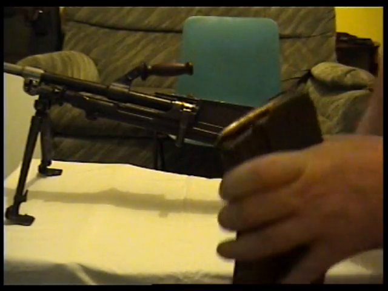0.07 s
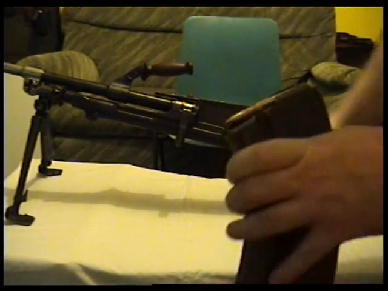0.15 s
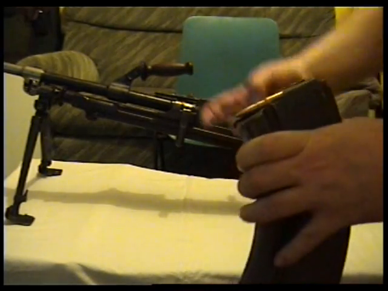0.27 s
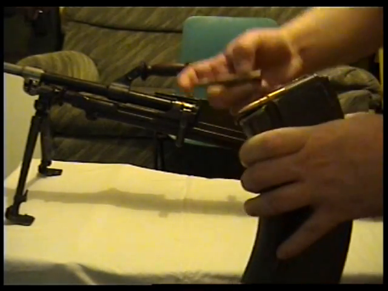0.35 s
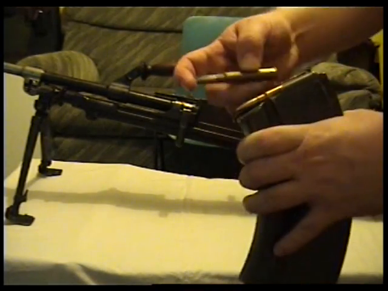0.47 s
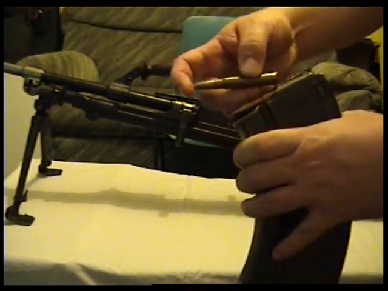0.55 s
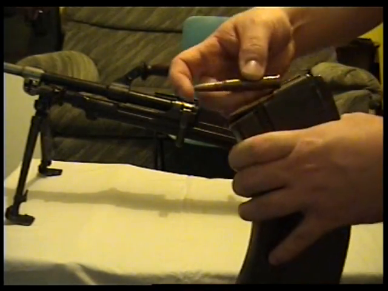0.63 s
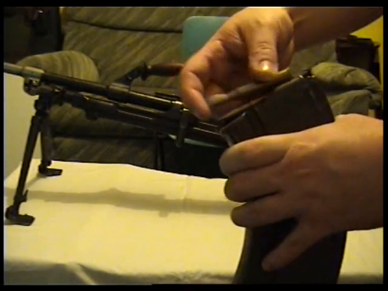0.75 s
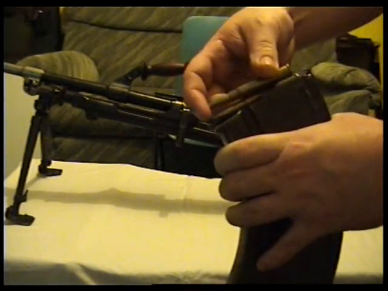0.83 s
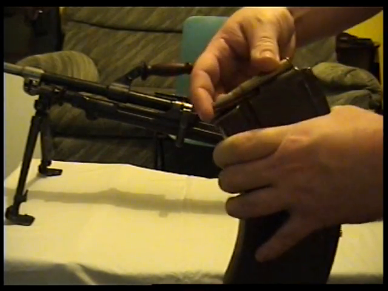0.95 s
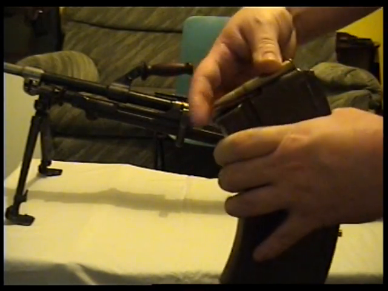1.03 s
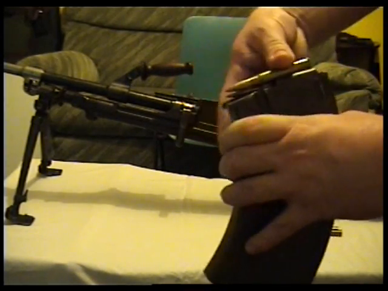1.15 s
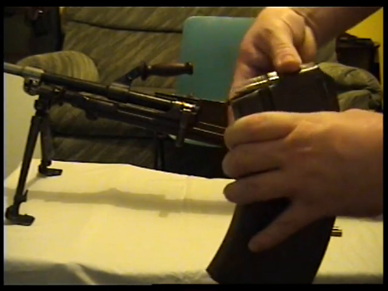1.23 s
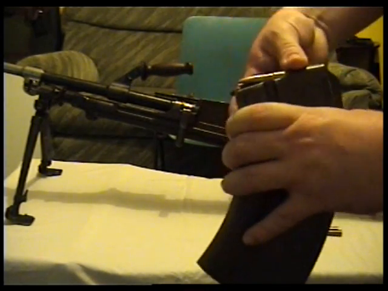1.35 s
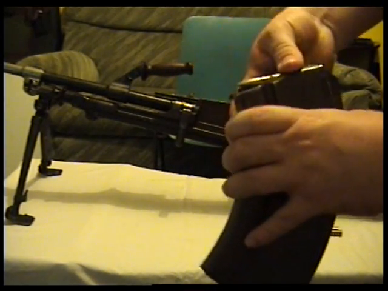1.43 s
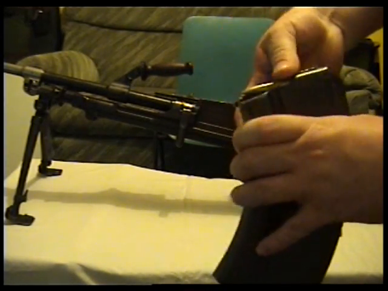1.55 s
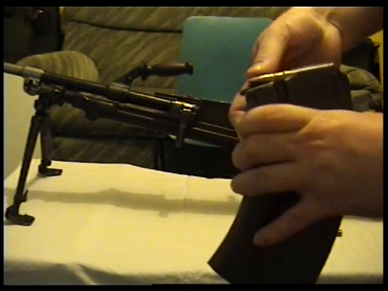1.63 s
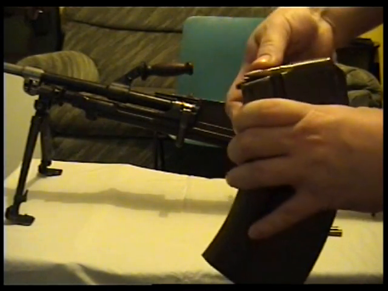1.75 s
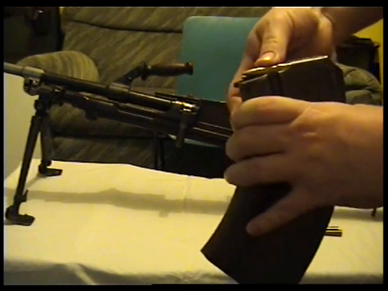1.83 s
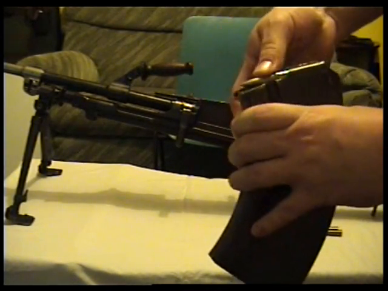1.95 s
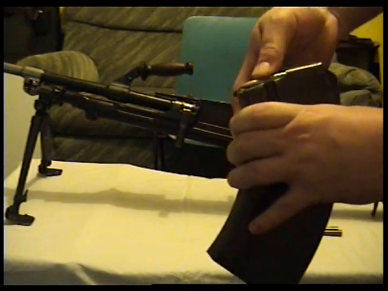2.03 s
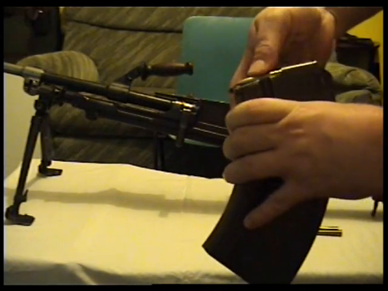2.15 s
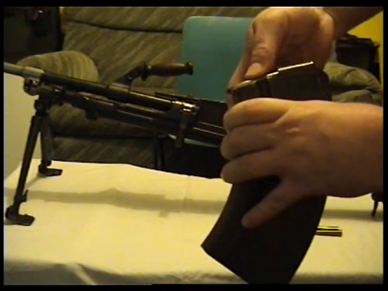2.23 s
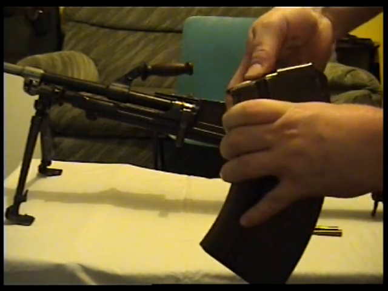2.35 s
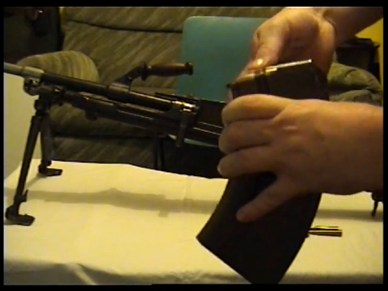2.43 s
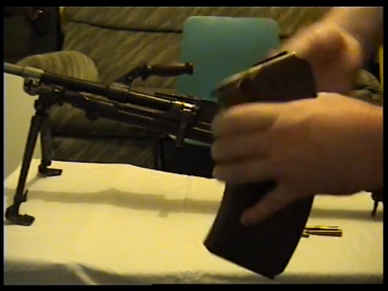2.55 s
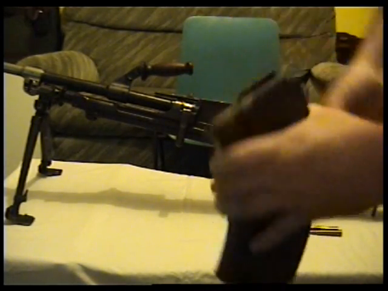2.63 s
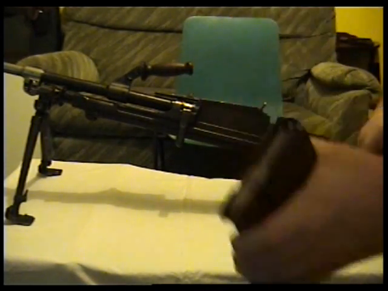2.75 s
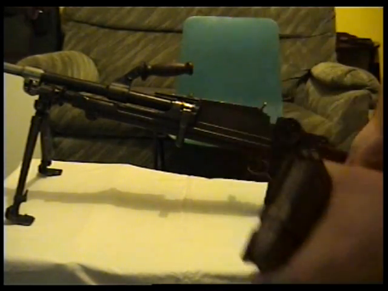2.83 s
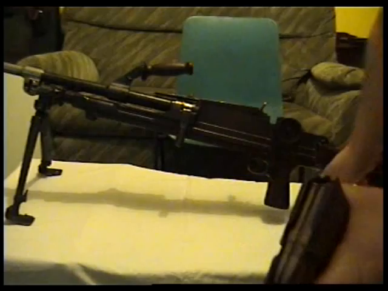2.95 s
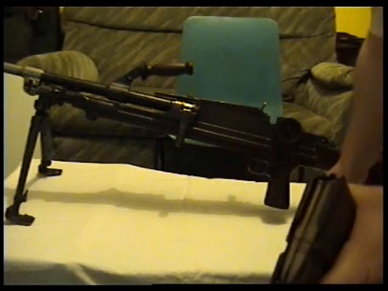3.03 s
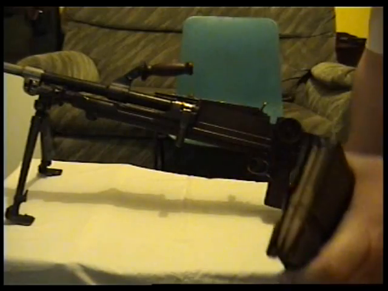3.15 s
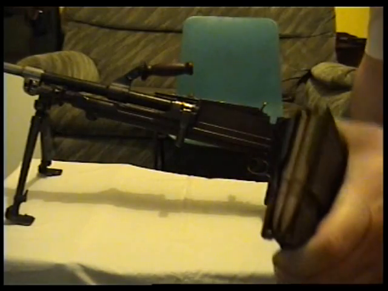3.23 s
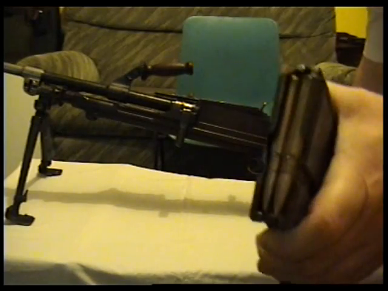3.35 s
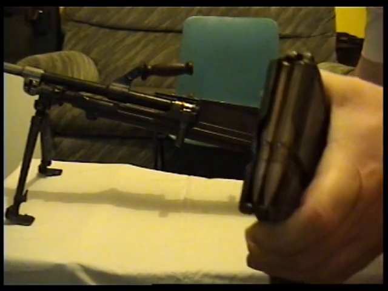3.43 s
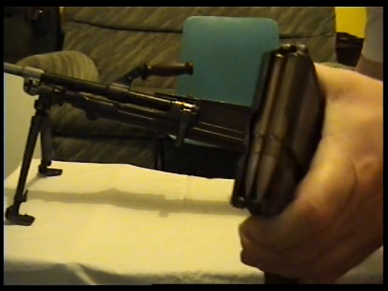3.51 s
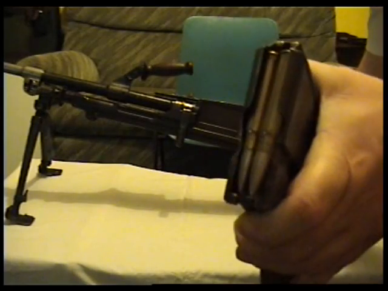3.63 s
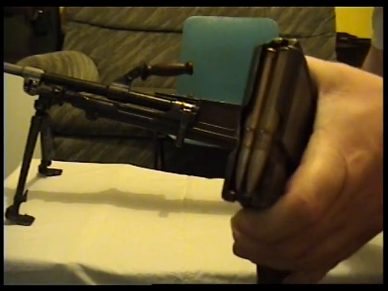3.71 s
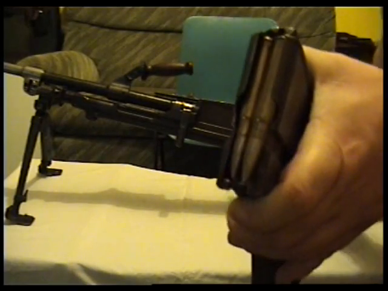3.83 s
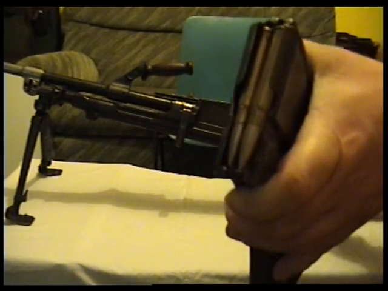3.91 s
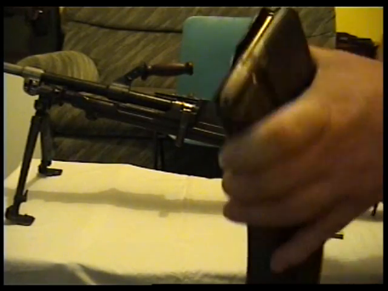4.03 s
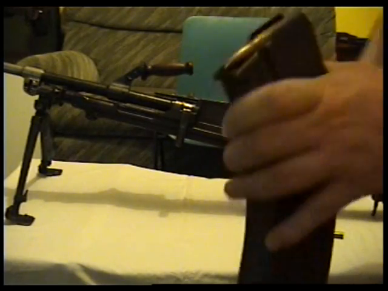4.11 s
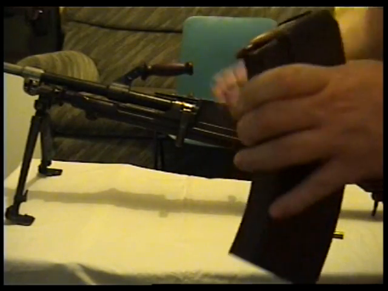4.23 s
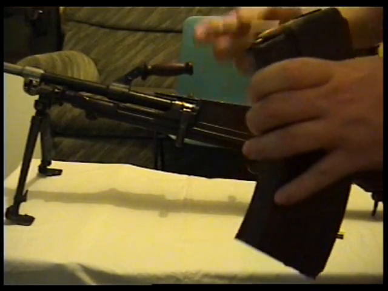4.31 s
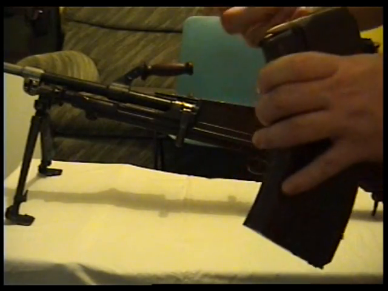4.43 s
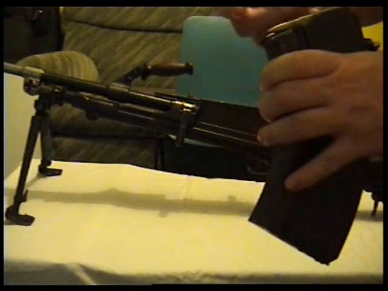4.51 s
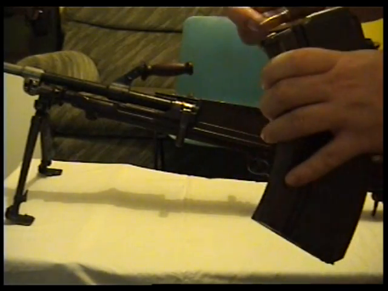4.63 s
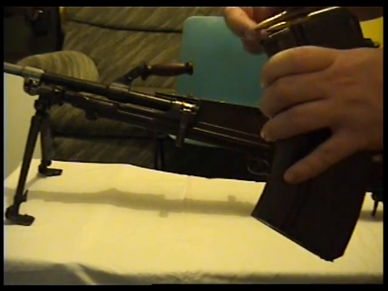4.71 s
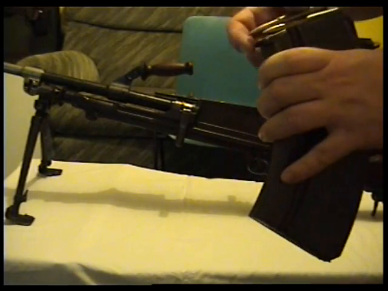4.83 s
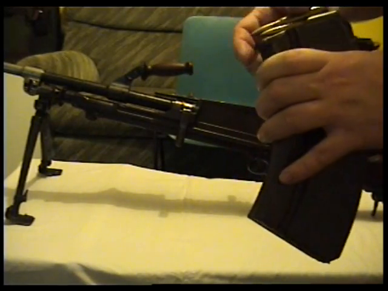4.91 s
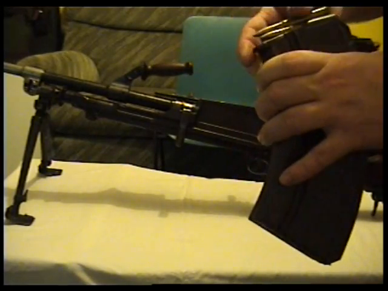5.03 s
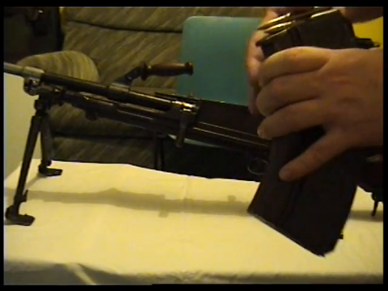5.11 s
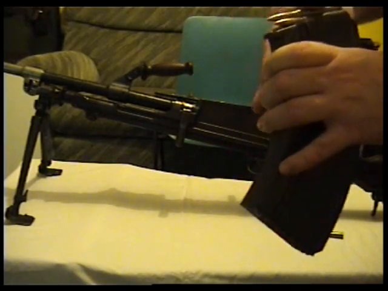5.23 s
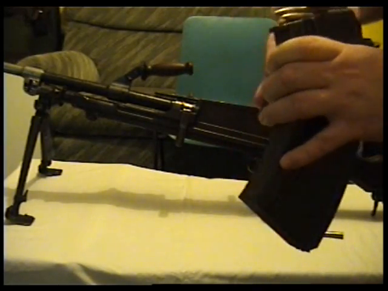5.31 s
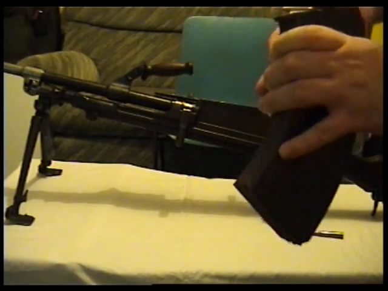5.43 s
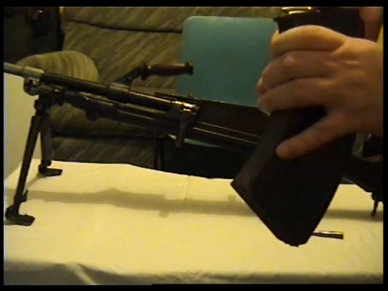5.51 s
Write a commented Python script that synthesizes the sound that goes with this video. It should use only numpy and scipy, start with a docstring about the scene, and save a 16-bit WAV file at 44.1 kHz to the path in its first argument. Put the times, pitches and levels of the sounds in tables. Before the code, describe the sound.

Close to the microphone in a small furnished room, a cartridge knocks on a steel magazine, scrapes along its lips and snaps in hard. A second snap follows, then loose brass cases clink in the hand, and two or three more quick knocks and grinding snaps end the passage over faint hiss.

```python
"""Knocks, scrapes and grinding snaps as rifle cartridges are thumbed into a steel magazine in a small room.
Between loads, loose brass cases clink and rub in the hand over a faint hum and hiss.
Each contact is a noise crack plus damped magazine modes, filtered for the place where brass meets steel.
Scrapes, slides and grinds are random trains of such contacts; the cases are high damped modes plus noise.
Filtered noise tails give the room; a limiter, clipping and a low-pass give hard, flattened peaks and a dull top."""
import sys
import numpy as np
from scipy import signal
from scipy.fft import rfft, irfft
from scipy.io import wavfile
from scipy.ndimage import uniform_filter1d, minimum_filter1d

SR = 44100
rng = np.random.default_rng(int(sys.argv[2]) if len(sys.argv) > 2 else 0)


def generate_wav(signal):
    """Clip the signal to [-1, 1] and save it as 16-bit WAV at the path in sys.argv[1]."""
    frames = np.transpose(np.atleast_2d(signal))
    scaled = np.clip(frames, -1, 1) * 32767
    pcm = np.round(scaled).astype(np.int16)
    wavfile.write(sys.argv[1], SR, pcm)


N = 245195
SIZE = 16384  # samples per single sound or impulse response
T = np.arange(SIZE) / SR
TIME = np.arange(N) / SR
HZ = np.maximum(np.arange(SIZE // 2 + 1) * SR / SIZE, 1)
TOP_HZ = 12000
SILENT_DB = -120


def undb(db):
    """Decibels to amplitude gain."""
    return 10 ** (np.asarray(db) / 20)


def unit(x):
    """Scale to an energy of one."""
    return x / np.sqrt(np.sum(x ** 2))


def along(points, hz):
    """Interpolate (f/Hz, value) points on a log-frequency axis."""
    f, value = np.transpose(points)
    return np.interp(np.log(hz), np.log(f), value)


def fade(t60_s):
    """Exponential decay, 60 dB down at t60_s."""
    return np.exp(-np.log(1000) * T / max(t60_s, 1e-3))


def colour(x, gain_db):
    """Minimum-phase filter with a given gain on HZ, via the folded cepstrum."""
    cepstrum = irfft(np.log(undb(gain_db)))
    cepstrum[1:SIZE // 2] *= 2
    cepstrum[SIZE // 2 + 1:] = 0
    response = np.exp(rfft(cepstrum))
    return irfft(rfft(x, SIZE) * response)


def bump(hz, width_hz):
    """Power response of one resonance, width_hz wide at half power."""
    return 1 / (1 + ((HZ ** 2 - hz ** 2) / (HZ * width_hz)) ** 2)


def burst(envelope, count=3):
    """Noise under an envelope, alternately flattened in spectrum and reshaped in time."""
    x = rng.standard_normal(SIZE) * envelope
    for _ in range(count):
        x = irfft(np.exp(1j * np.angle(rfft(x))))  # keep phase only
        local_rms = np.sqrt(uniform_filter1d(x ** 2, size=128).clip(0) + 1e-12)
        x = x * envelope / local_rms
    return unit(x)


def ring(modes, scatter_db, detune):
    """Damped modes whose shares and pitches vary with the place of contact and the grip."""
    hz, level_db, t60_s = np.transpose(modes)[:, :, None]
    share, shift, side = rng.standard_normal((3, len(modes), 1))
    tones = np.sin(2 * np.pi * hz * (1 + detune * shift) * T)
    decays = np.exp(-np.log(1000) * T / t60_s)
    gains = np.sign(side) * undb(level_db + scatter_db * share)
    return unit(np.sum(gains * tones * decays, axis=0))


def add(out, start_s, x, level_db, length_s):
    """Mix x in at start_s, its rms over the first length_s set to level_db."""
    start = int(start_s * SR)
    opening = x[:max(int(length_s * SR), 8)]
    x = x * undb(level_db) / np.sqrt(np.mean(opening ** 2))
    out[start:start + len(x)] += x[:max(N - start, 0)]


def nodes(count=44):
    """Gain ripple in dB: each point of contact favours some groups of modes and misses others."""
    hz = np.geomspace(700, TOP_HZ, count)
    ripple = 3.5 * rng.standard_normal(count)
    return along(np.c_[hz, ripple - uniform_filter1d(ripple, size=5)], HZ)


def contact(crack_t60_s, ring_db, body_db, treble_db, point_hz, point_db):
    """Magazine's answer to one tap: crack plus ring, coloured by where and how hard brass meets steel."""
    # crowded, quickly damped steel modes: f/Hz, gain/dB
    crack_gain = [(60, -33), (360, -24), (530, -2.5), (650, 7), (780, -3.5), (1100, 0), (1320, -2),
                  (1750, 1.5), (4000, -4.5), (5500, -2), (8500, -12), (11200, -13.5)]
    # modes of the loaded magazine, free of the hand: f/Hz, mean relative level/dB, t60/s
    magazine_modes = [(480, -5.5, 0.043), (582.7, 2.5, 0.16), (644.2, 3.5, 0.36), (850, -2.5, 0.24),
                      (924, 1, 0.054), (978, 4, 0.12), (1127, 2.5, 0.15), (1556, 5.5, 0.14),
                      (1684, -8, 0.11), (1856, -7, 0.063), (2007, -2, 0.0966), (2410, -12, 0.062),
                      (2704, -4, 0.052), (2770, -9, 0.03), (3220, -25.5, .11), (3540, 5.5, 0.068),
                      (3500, -16, 0.063), (4120, 4.5, 0.053), (4170, -1.5, 0.07), (4180, -6.5, 0.166),
                      (4610, -12, .09), (4900, -10, 0.22), (5780, -30, .13), (6030, -12, 0.07),
                      (6140, -4.5, 0.21), (6640, -14, 0.3), (8050, -20, 0.078), (8950, -14, .12)]
    body_hz, treble_hz, lips_hz, lips_db = 1030, 6220, 3940, 5.5
    grip_t60_s = 0.55

    crack = unit(colour(burst(fade(crack_t60_s)), along(crack_gain, HZ) + nodes()))
    free_ring = ring(magazine_modes, scatter_db=2.0, detune=0.0064)
    gripped = unit(free_ring * fade(grip_t60_s))  # the hand shortens the ring
    body = body_db / (1 + (HZ / body_hz) ** 4)
    treble = treble_db / (1 + (treble_hz / HZ) ** 6)
    lips = lips_db * bump(lips_hz, 0.35 * lips_hz)
    point = point_db * bump(point_hz, 0.16 * point_hz)
    return colour(crack + undb(ring_db) * gripped, body + treble + lips + point)


def stick_slip(times_s, levels_db, ring_db, *tone):
    """Brass rubs on steel: a fast, uneven train of taps under a level curve, each answered by the magazine."""
    mean_slips_per_s, scatter_db, crack_t60_s = 3000, 1.5, 0.019
    fires = rng.random(N) < mean_slips_per_s / SR
    signs = rng.choice([-1, 1], N)
    slips = fires * signs * undb(scatter_db * rng.standard_normal(N))
    pressure = undb(np.interp(TIME, times_s, levels_db, left=SILENT_DB, right=SILENT_DB))
    response = unit(contact(crack_t60_s, ring_db, *tone))
    return signal.oaconvolve(pressure * slips / np.std(slips), response)[:N]


def air(level_db=-45, hum_hz=108, hum_db=-64, hiss_hz=4550, hiss_width_hz=800, hiss_db=4):
    """Steady room tone and microphone hiss: shaped noise with a slight treble peak, plus a faint sine hum."""
    # noise spectrum: f/Hz, relative density/dB
    noise_spectrum = [(15, -32), (25, -32.5), (53, -0.5), (76, -20), (98, -1), (133, -7.5), (186, -1.5),
                      (459, -2), (496, -3), (749, 2), (853, -3.5), (2160, -10.5), (2450, -16),
                      (4210, -20.5), (11800, -31), (15300, -69), (22000, -120)]
    hz = np.maximum(np.arange(N // 2 + 1) * SR / N, 1)
    peak_db = hiss_db * np.interp(hz, HZ, bump(hiss_hz, hiss_width_hz))
    gain = undb(along(noise_spectrum, hz) + peak_db)
    hiss = irfft(rfft(rng.standard_normal(N)) * gain, N)
    hum = np.sqrt(2) * np.sin(2 * np.pi * hum_hz * TIME)  # rms of one
    return undb(level_db) * hiss / np.std(hiss) + undb(hum_db) * hum


def room(x, gap_s=0.00237, tail_db=-9.5):
    """Table, sofa and walls return a short, dense noise tail, decaying at its own rate in each band."""
    # decay by band: f/Hz, t60/s
    band_decays = [(200, 0.27), (600, 0.39), (1500, 0.27), (4000, 0.16), (10000, 0.16)]
    hz, t60s_s = np.transpose(band_decays)
    onset = np.clip(T / gap_s - 1, 0, 1)
    tail = 0
    for share, t60_s in zip(np.eye(len(hz)), t60s_s):
        band_power = along(np.c_[hz, share], HZ) + 1e-4
        tail = tail + colour(burst(onset * fade(t60_s)), 10 * np.log10(band_power))
    return x + undb(tail_db) * signal.fftconvolve(x, unit(tail))[:N]


def rubs():
    """The hand shifts its grip and rubs the cases: half-sine swells of narrow-band noise."""
    # t/s, length/s, level/dB, centre f/Hz, resonance width before squaring/Hz
    rub_events = [(3.182, 0.031, -43, 283, 160), (3.345, 0.066, -43.5, 210, 98),
                  (3.484, 0.063, -42, 2240, 520), (3.492, 0.065, -44, 6280, 406)]
    out = np.zeros(N)
    for start_s, length_s, level_db, hz, width_hz in rub_events:
        swell = np.sin(np.pi * np.minimum(T / length_s, 1))
        gain_db = 20 * np.log10(bump(hz, width_hz) + 0.0011)  # resonance squared in power
        add(out, start_s, colour(rng.standard_normal(SIZE) * swell, gain_db), level_db, length_s)
    return out


def clinks(tick_t60_s=0.09, tick_hz=3400, tick_width_hz=5000):
    """Cases held in the fingers clink: a gritty noise tick and a short, high ring of damped modes."""
    # t/s, level/dB, dull tick relative to ring/dB
    clink_events = [(3.195, -48, -6), (3.212, -35, -11), (3.319, -25.5, -22), (3.327, -26, -20),
                    (3.398, -16.5, -12), (3.403, -23.5, -24), (3.415, -16, -14)]
    # brass case modes: f/Hz, mean relative level/dB, t60/s
    case_modes = [(5500, -26, 0.2), (5600, -7, 0.074), (5810, -1, 0.076), (5680, -15, 0.14),
                  (5920, -2.5, 0.17), (6075, -1.5, 0.05), (6170, -6, .06)]
    out = np.zeros(N)
    # resonance squared in power, with a floor
    tick_gain_db = 20 * np.log10(bump(tick_hz, tick_width_hz) + 0.00087)
    for start_s, level_db, tick_db in clink_events:
        tick = unit(colour(burst(fade(tick_t60_s)), tick_gain_db))
        case_ring = ring(case_modes, scatter_db=3.0, detune=0.0037)
        add(out, start_s, case_ring + undb(tick_db) * tick, level_db, length_s=0.0038)
    return out


def slides(ring_db=-14, treble_db=-4, point_hz=2200, point_db=8, fade_share=2.8):
    """Light stick-slip as a round is eased along or creeps before a snap; longer strokes have softer ends."""
    # t/s, hold/s, level/dB, body/dB
    slide_events = [(0.667, 0.047, -43.5, -12), (0.957, 0.084, -48, 4.5), (1.11, 0.43, -41.5, 17),
                    (1.315, 0.01, -26.5, 11.5), (1.664, 0.088, -43, 17.5), (4.726, 0.02, -30.5, -5),
                    (4.797, 0.063, -32.5, 18), (4.859, 0.01, -27.5, 1), (5.006, 0.062, -38.5, 8.5),
                    (5.095, 0.057, -41, 11.5), (5.253, 0.0068, -28, 25), (5.45, 0.11, -43, 17.5),
                    (5.521, 0.015, -23, 14)]
    out = np.zeros(N)
    for start_s, hold_s, level_db, body_db in slide_events:
        edge_s = fade_share * hold_s
        end_s = start_s + hold_s
        times_s = [start_s - edge_s, start_s, end_s, end_s + edge_s]
        levels_db = [SILENT_DB, level_db, level_db, SILENT_DB]
        out += stick_slip(times_s, levels_db, ring_db, body_db, treble_db, point_hz, point_db)
    return out


def scrape(ring_db=-14, body_db=-4, treble_db=-5, point_hz=1400, point_db=5):
    """The first round scrapes along the feed lips: one long, firm, uneven stick-slip stroke."""
    # level curve: t/s, level/dB
    stroke = [(0.76, -45), (0.792, -26), (0.802, -18.5), (0.81, -27), (0.83, -19.5), (0.852, -23.5),
              (0.866, -32), (0.888, -32), (0.9, -43)]
    return stick_slip(*np.transpose(stroke), ring_db, body_db, treble_db, point_hz, point_db)


def grinds(ring_db=-16, point_db=5.5):
    """The stack gives way on its spring: stick-slip rises fast, holds and dies, with a low thump at its start."""
    # t/s, hold/s, level/dB, thump relative to grind/dB, body/dB, treble/dB, contact resonance f/Hz
    grind_events = [(1.325, 0.059, -8.5, -21, 1, 2.5, 4250), (2.098, 0.0032, -30, -12, 15, -6, 930),
                    (2.542, 0.025, -10, -20.5, 5, 5, 1580), (4.736, 0.014, -14.5, -28, 8.5, -5.5, 6100),
                    (4.862, 0.011, -17.5, -20, 5.5, 5.5, 6000), (5.525, 0.036, -6.5, -7.5, -3, 1.5, 3400)]
    attack_s, release_db_per_s = 0.0078, 376.5
    thump_hz, thump_width_hz, thump_t60_s = 293, 290, 0.036
    out = np.zeros(N)
    for start_s, hold_s, level_db, thump_db, *tone in grind_events:
        end_s = start_s + hold_s
        settled_s = end_s + (level_db - SILENT_DB) / release_db_per_s
        times_s = [start_s - attack_s, start_s, end_s, settled_s]
        levels_db = [SILENT_DB, level_db, level_db, SILENT_DB]
        out += stick_slip(times_s, levels_db, ring_db, *tone, point_db)
        thump_gain_db = 10 * np.log10(bump(thump_hz, thump_width_hz))
        thump = colour(burst(fade(thump_t60_s)), thump_gain_db)
        add(out, start_s, thump, level_db + thump_db, length_s=0.0044)
    return out


def knocks(crack_t60_s=0.028, ring_db=-7):
    """Single blows on the feed lips; a harder blow brings out the contact resonance more."""
    # t/s, level/dB, body/dB, treble/dB, contact resonance f/Hz
    knock_events = [ (0.136, -34, 14, -2, 680), (0.591, -2, 0, 0, 2680), (0.662, -23.5, 4, -5, 1580),
                    (0.714, -9, -8, -8, 5200), (0.739, -21.5, -2, -10, 1550), (0.801, -21, -4.5, -15, 2500),
                    (0.876, -19.5, 2, -13, 1580), (0.886, -18, 6, -2, 1400), (1.046, -12.5, 6.5, -6, 1850),
                    (1.167, -30.5, 16, 3, 695), (1.328, -1.5, -6, -0.5, 1615), (1.335, -6, -8, 3, 3240),
                    (1.347, -0.5, 0, 13, 4200), (1.477, -28.5, 2, -11, 4200),
                    (2.036, -29.5, 20.5, -32, 1850), (2.092, -14.5, 15.5, -11, 1130),
                    (2.100, -17.5, 8, -2.5, 534), (2.301, -21, 11.5, -2.5, 495),
                    (2.326, -36, 18, -20, 1560), (2.475, -20, 4, -10, 1540), (2.545, -1.5, -0.5, 9, 1840),
                    (4.640, -2, -14, -2, 2680), (4.649, -13, -3, -19, 1100), (4.735, -5.5, 5.5, -1.5, 2390),
                    (4.832, -17.5, 9, -6, 4530), (4.865, -5.5, 7, 11.5, 1960),
                    (5.039, -14.5, 5.5, -6, 2220), (5.172, -34, 15, 4, 3950), (5.264, -14, 4, -1, 530),
                    (5.529, -2.5, 5, -3, 2130), ]
    point_db_at_0_db, point_db_per_db = 12, 0.28
    out = np.zeros(N)
    for start_s, level_db, *tone in knock_events:
        point_db = point_db_at_0_db + point_db_per_db * level_db
        blow = contact(crack_t60_s, ring_db, *tone, point_db)
        add(out, start_s, blow, level_db, length_s=0.003)
    return out


def scene():
    """All handling in the room, over its steady tone."""
    handling = rubs() + clinks() + slides() + scrape() + grinds() + knocks()
    return (room(handling) + air())[None]


def record(dry, ceiling=1.33):
    """A fast limiter holds the snaps, remaining peaks clip at one, and a steep low-pass cuts the top."""
    local_max = -minimum_filter1d(-np.abs(dry), size=66)  # 1.5 ms window
    peak = uniform_filter1d(local_max, size=66)
    limited = dry / np.maximum(peak / ceiling, 1)
    clipped = np.clip(limited, -1, 1)
    low_pass = signal.ellip(10, .2, 70, TOP_HZ, fs=SR, output="sos")
    return signal.sosfilt(low_pass, clipped)


dry = scene()
out = record(dry)
generate_wav(out)
```